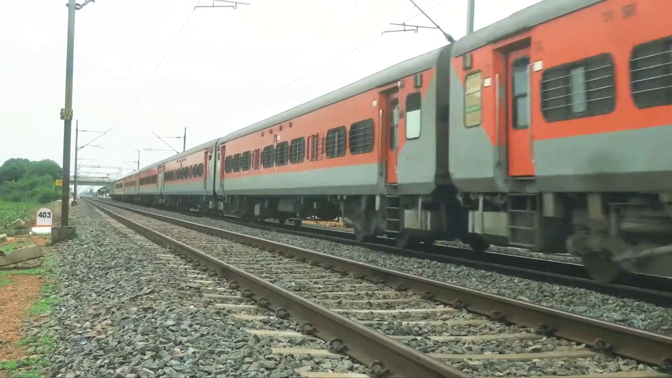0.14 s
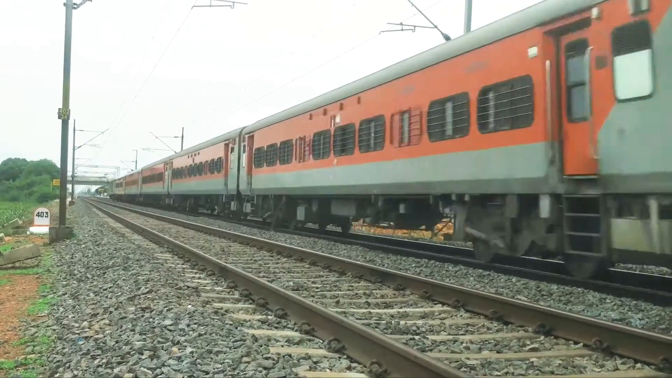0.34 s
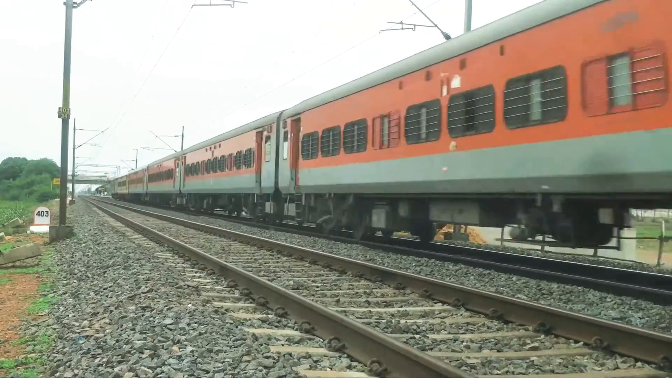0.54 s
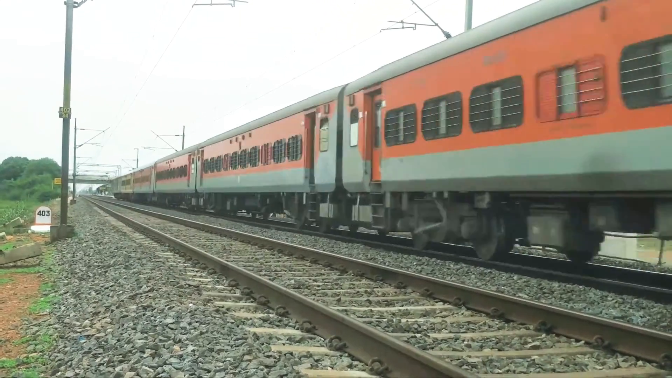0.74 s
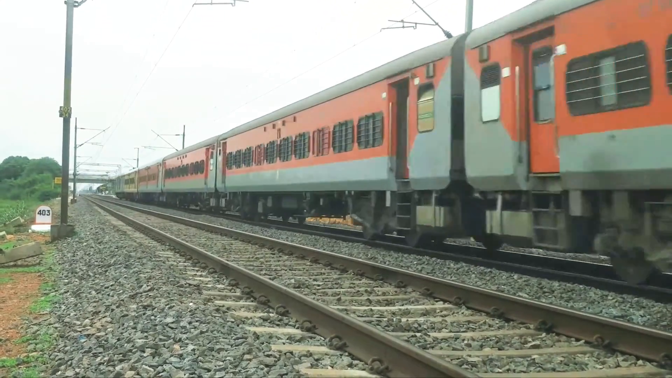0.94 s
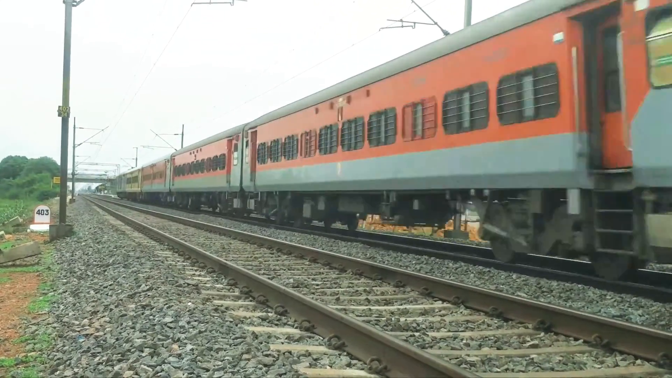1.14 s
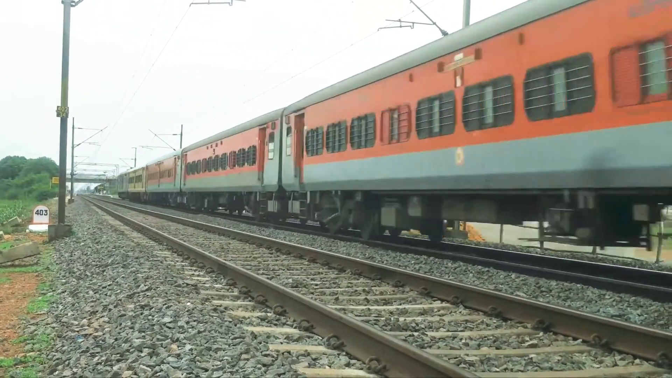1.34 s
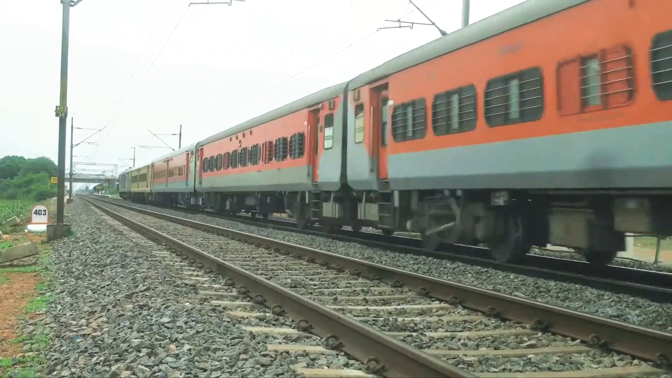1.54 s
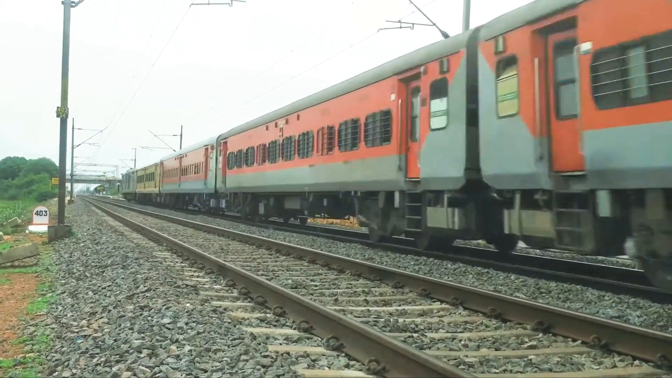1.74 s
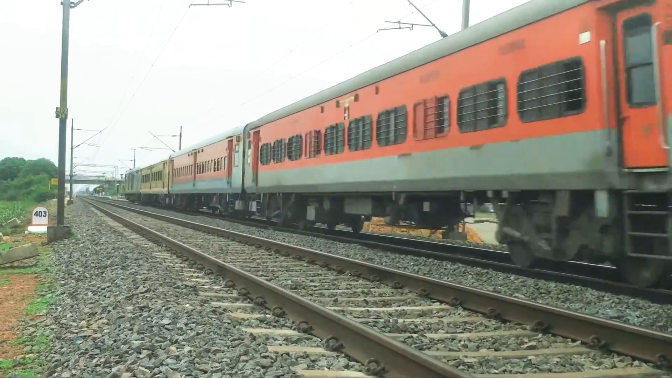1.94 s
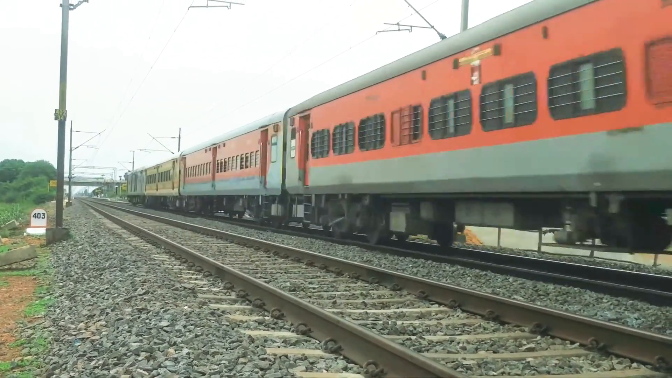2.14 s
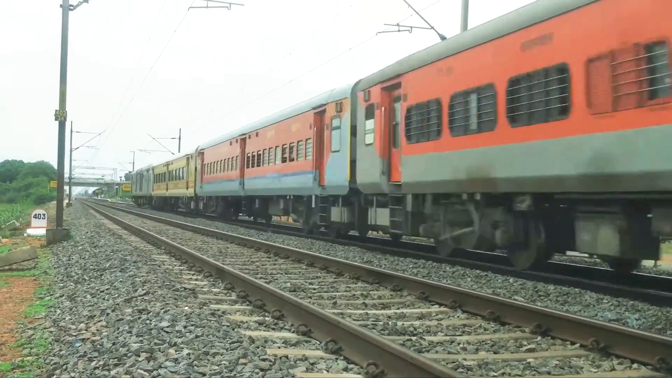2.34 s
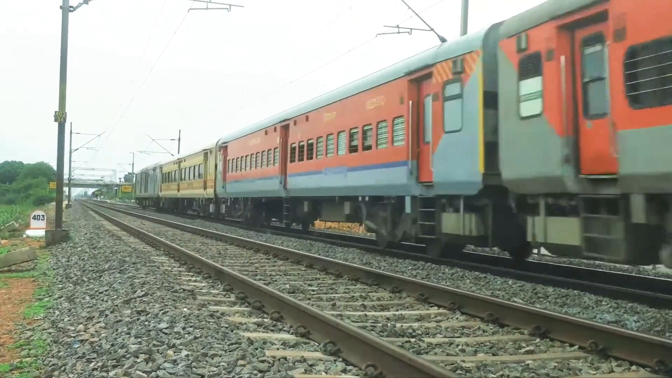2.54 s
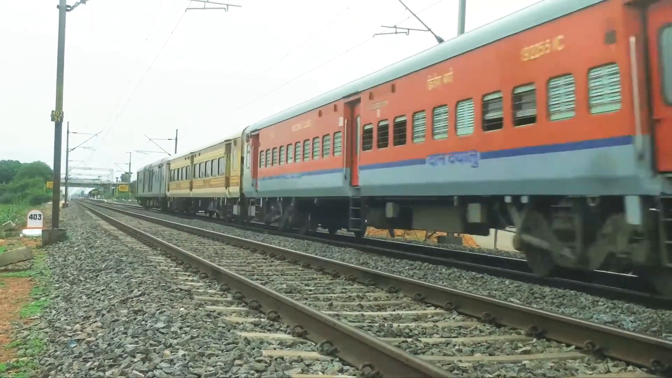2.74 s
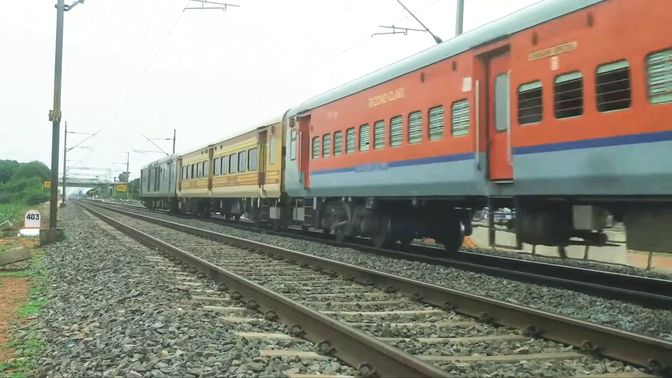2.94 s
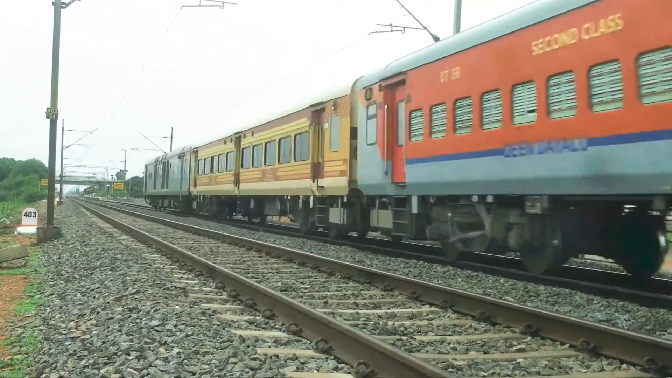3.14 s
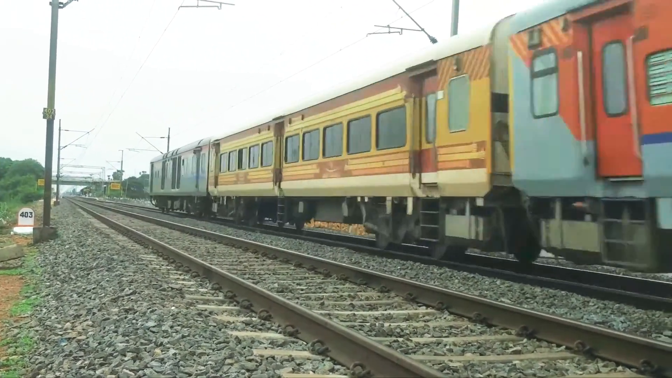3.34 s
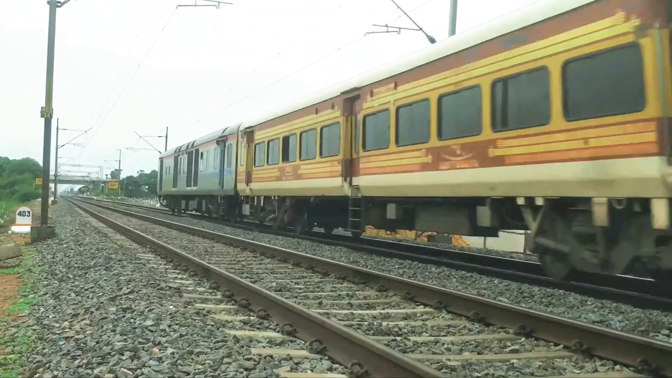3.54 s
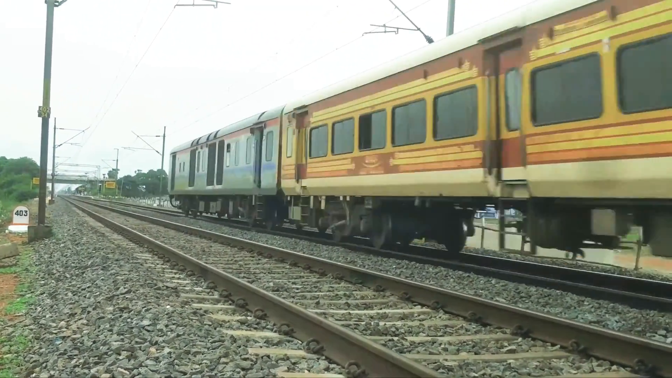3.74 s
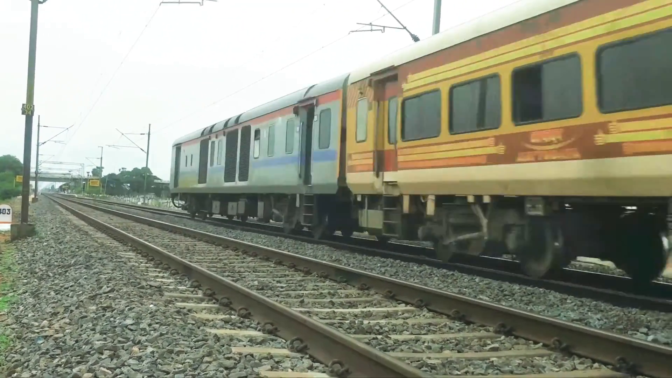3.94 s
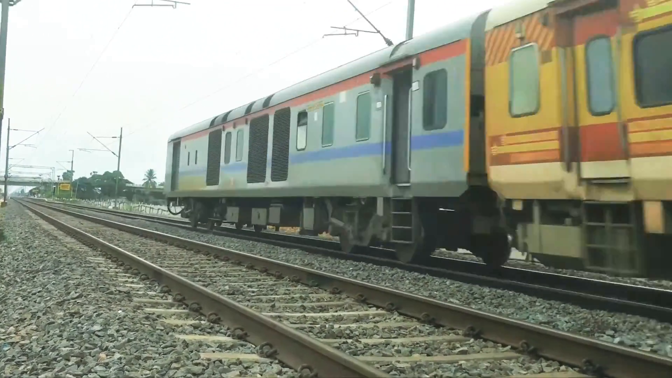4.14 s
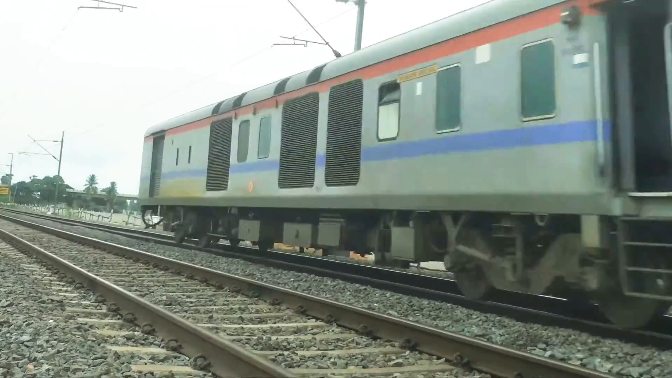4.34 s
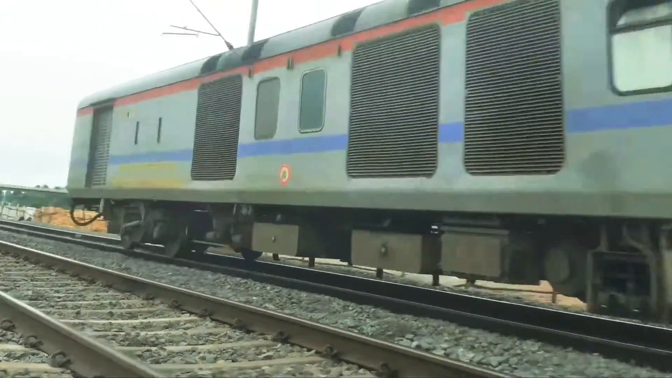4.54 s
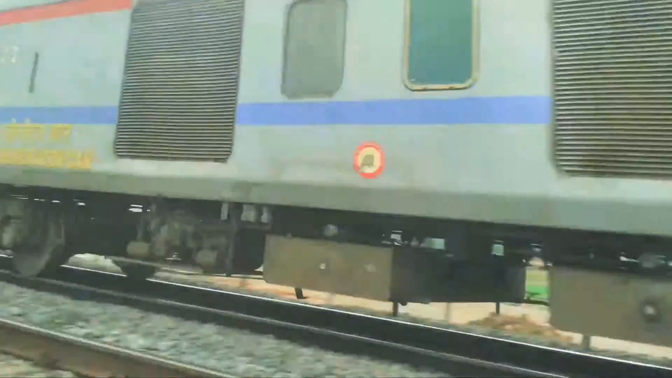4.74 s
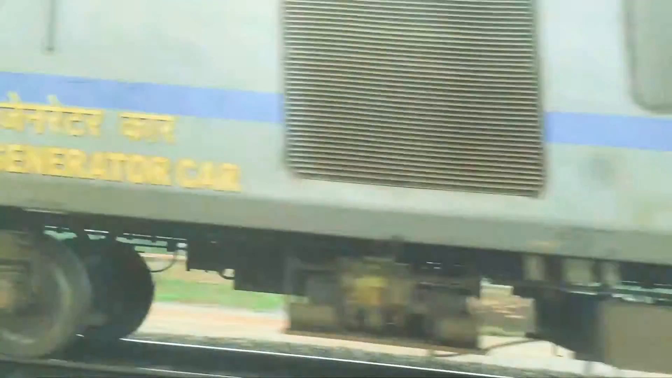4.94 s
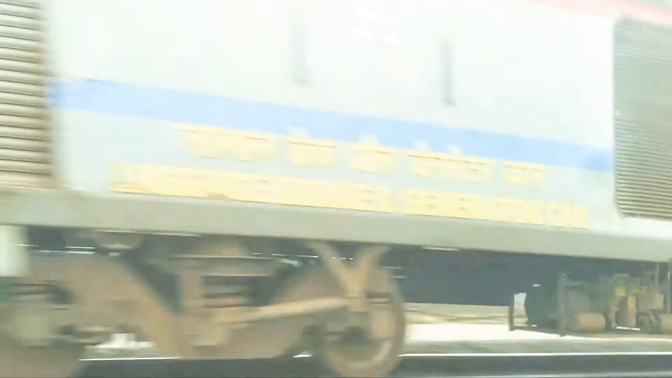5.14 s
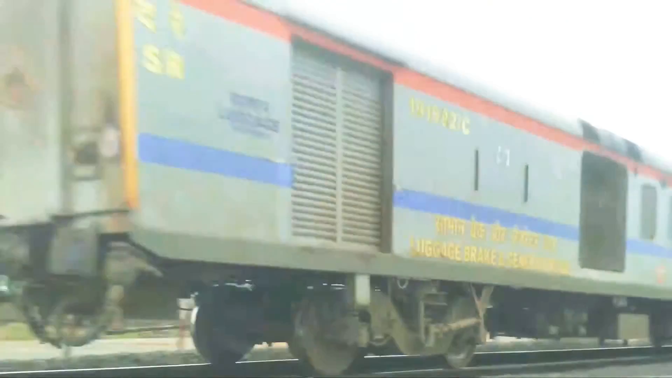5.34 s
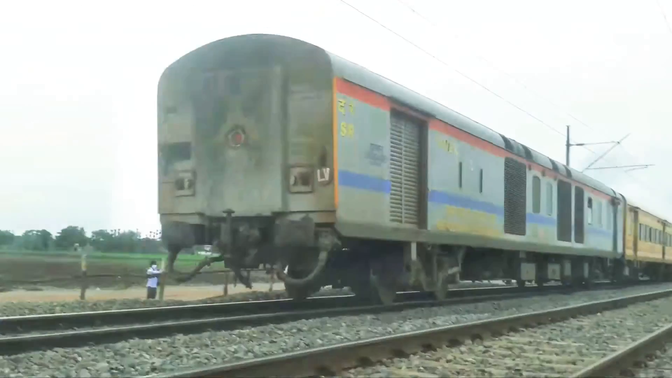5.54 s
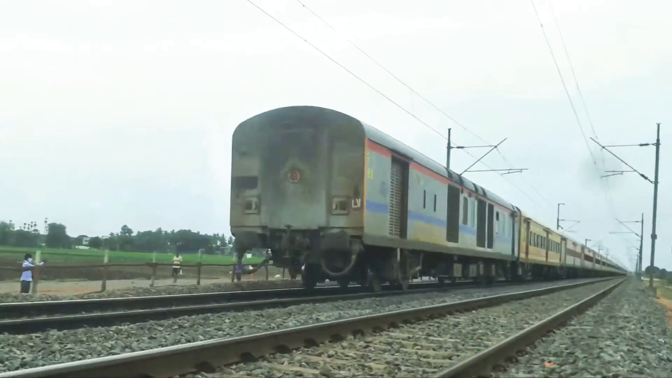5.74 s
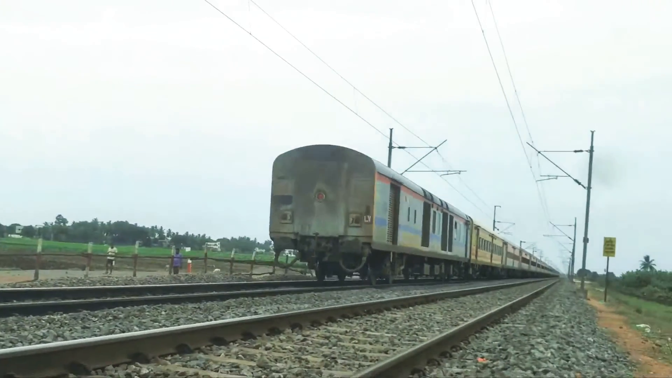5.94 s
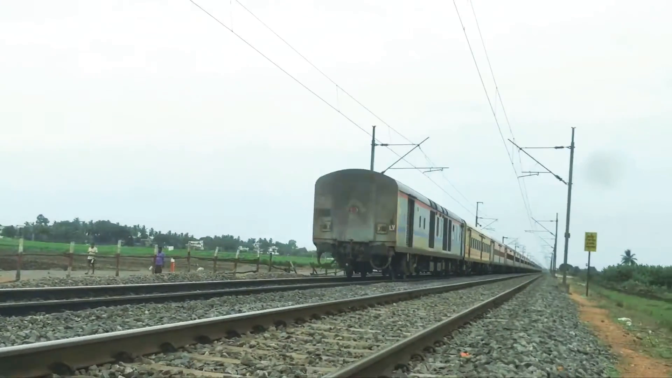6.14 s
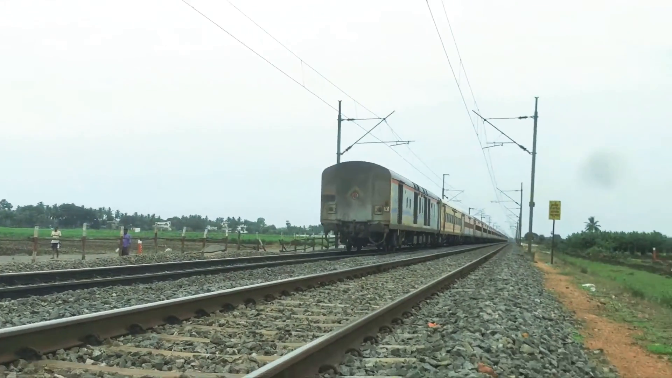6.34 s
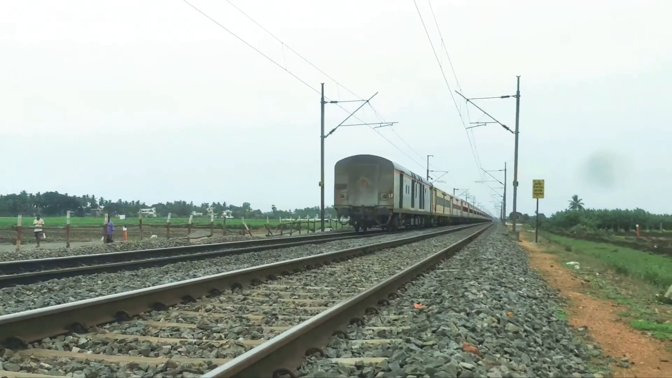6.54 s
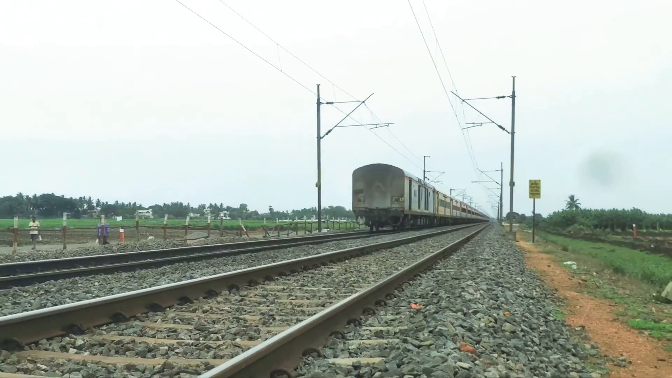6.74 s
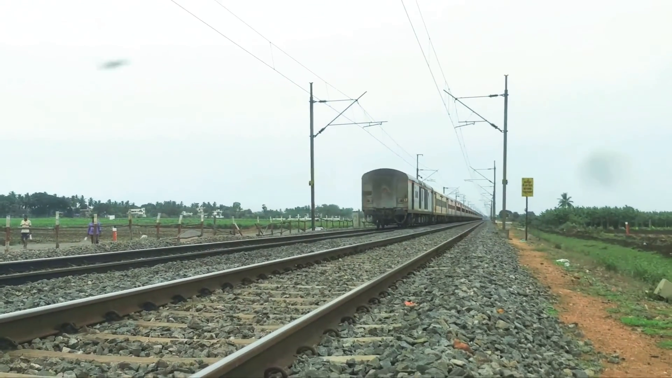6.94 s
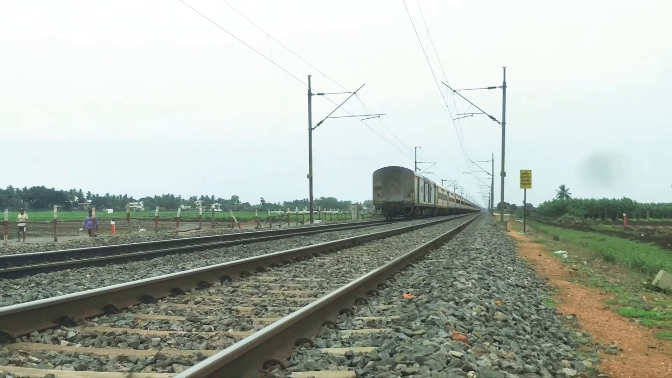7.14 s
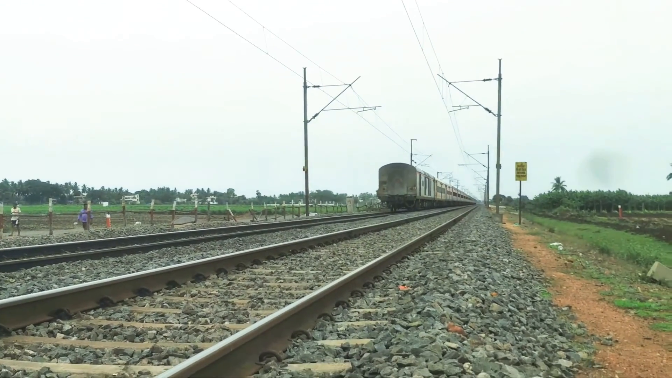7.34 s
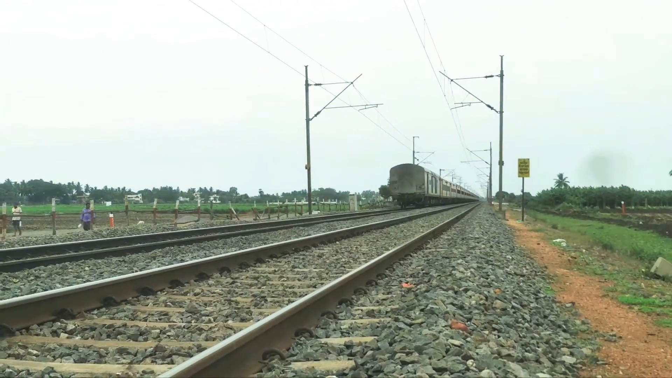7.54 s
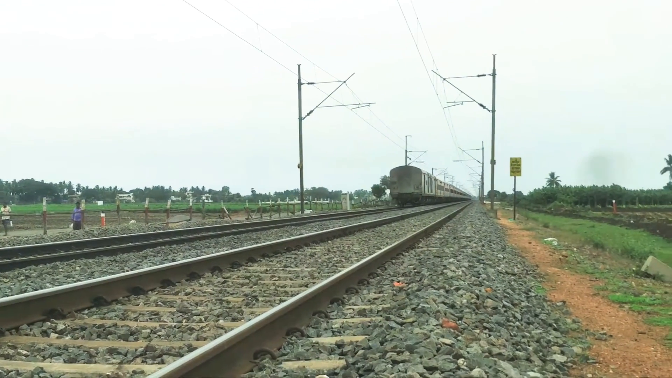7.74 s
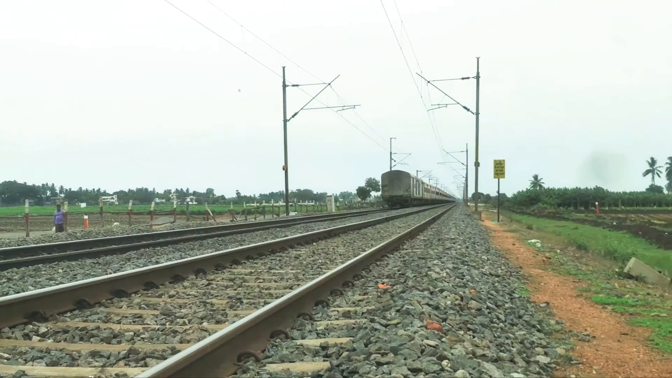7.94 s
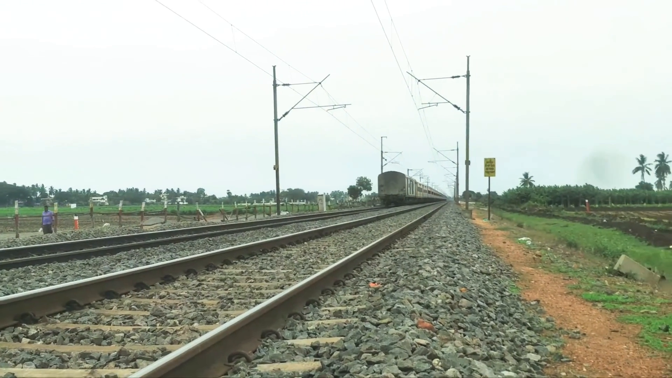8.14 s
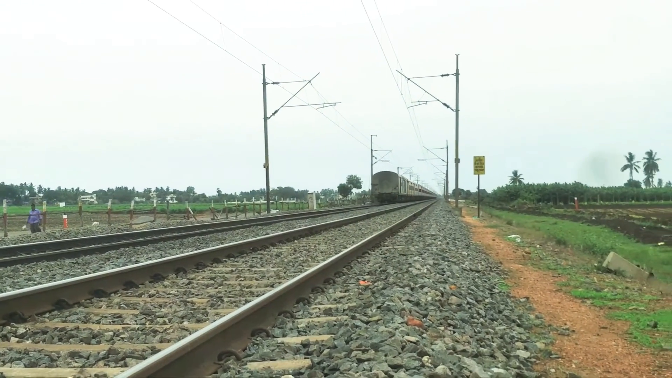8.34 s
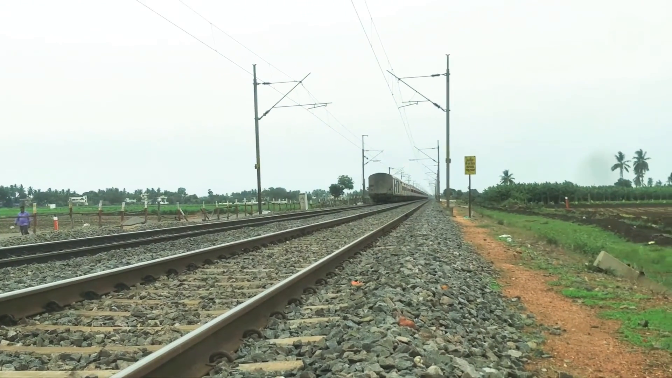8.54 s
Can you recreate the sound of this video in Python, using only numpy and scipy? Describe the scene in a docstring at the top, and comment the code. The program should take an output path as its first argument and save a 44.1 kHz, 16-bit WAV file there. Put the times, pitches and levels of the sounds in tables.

```python
"""A long passenger train rushes past 7 m from a pair of microphones. Worn wheels thump and clang on the rails,
and the ringing of resonant wheel modes glides down in pitch as each pair of bogies goes by. Filtered noise
makes the rumble, roar and hiss; the pair turns to follow the last coach, whose generator hums. Then the last
wheels drum and hum in the distance over steady ringing notes, and a horn, a stack of harmonics, sounds faintly
at the end."""
import sys
import numpy as np
from scipy import signal
from scipy.fft import rfft, irfft, next_fast_len
from scipy.io import wavfile
from scipy.ndimage import uniform_filter1d, minimum_filter1d, map_coordinates

SR = 44100
rng = np.random.default_rng(int(sys.argv[2]) if len(sys.argv) > 2 else 0)


def store_wav(level_fs):
    """Save 16-bit WAV to argv[1]."""
    pcm = np.round(np.clip(np.atleast_2d(level_fs), -1, 1) * 32767)
    wavfile.write(sys.argv[1], SR, pcm.T.astype(np.int16))


N = 379241
SPEED, SOUND_SPEED = 31, 343  # train and sound, m/s
TAIL_S = 5.455  # the last wheels draw level
TURN_S, FIRST_TURN_S = .1008, 5.0826  # one turn of the last wheels and the start of their first, s


def amp(db):
    """Decibels to gain."""
    return 10 ** (np.asarray(db) / 20)


def unit(x):
    """Scale to rms 1."""
    return x / np.sqrt(np.mean(x ** 2) + 1e-20)


def clock():
    """The time of every sample in seconds."""
    return np.arange(N) / SR


def along(points, hz):
    """Read (Hz, value) points at any frequency, on a log axis."""
    f, v = np.transpose(points)
    return np.interp(np.log(hz + 1), np.log(f + 1), v)


def curves(rows):
    """One value per sample for each column after the time."""
    s, *cols = np.transpose(rows)
    return [np.interp(clock(), s, c) for c in cols]


def wobble(rate):
    """A smooth random curve, rate knots a second."""
    finer = 2 ** 4
    knots = rng.standard_normal(int(N * rate / SR) + 4)
    smooth = signal.resample_poly(knots, finer, 1)
    return np.interp(clock() * rate * finer, np.arange(len(smooth)), smooth)


def filtered(x, response):
    """x times a response of frequency."""
    size = next_fast_len(N + SR // 2, real=True)
    hz = np.fft.rfftfreq(size, 1 / SR)
    return irfft(rfft(x, size) * response(hz), size)[..., :N]


def add(track, s, sound):
    """Mix a short sound into a track at time s."""
    start = int(np.clip(round(s * SR), 0, N - 1))
    track[start:start + len(sound)] += sound[:N - start]


# Likeness of the two microphones. Each row: frequency in Hz, left-right likeness from 0 to 1.
LIKENESS = [(60, 0.99), (250, 0.99), (600, 0.76), (1500, 0.38), (2500, 0.099), (4000, 0.088), (10000, 0.18)]


def rush(spectrum):
    """Stereo noise of rms 1, much less alike at the two microphones in the treble than in the bass."""
    def mid_and_side(hz):
        angle = np.arccos(np.clip(along(LIKENESS, hz), -1, 1)) / 2
        return amp(along(spectrum, hz)) * [np.cos(angle), np.sin(angle)]

    mid, side = filtered(rng.standard_normal((2, N)), mid_and_side)
    return unit(np.array([mid + side, mid - side]))


# Where the microphones face. Each row: time in seconds, degrees turned from facing the track
# (negative is towards the oncoming coaches).
FACING = [(0, -62.5), (4.0, -54.5), (4.8, -44.5), (5.0, -22), (5.35, 35.5), (5.6, 58.5), (6.0, 67),
          (8.6, 74)]


def ear_lag(bearing, spacing_ms=0.5):
    """Seconds by which each microphone hears a source late; bearing 0 is straight across the track."""
    heading, = curves(FACING)
    lag = spacing_ms / 1000 * np.sin(bearing - np.radians(heading)) / 2
    return np.array([lag, -lag])


def placed(pair, bearing):
    """Give a stereo sound its direction by its arrival times at the two microphones."""
    t = clock()
    return np.array([np.interp(t - lag, t, ear) for lag, ear in zip(ear_lag(bearing), pair)])


def path(closest_s, t, track_m=7.):
    """Distance in metres and bearing at times t of a bogie that passes at closest_s."""
    x = SPEED * (t - closest_s)
    return np.hypot(x, track_m), np.arctan2(x, track_m)


def receded(fade_s=1.0):
    """0 while the coaches pass, rising to 1 once the last one is by."""
    return np.clip((clock() - TAIL_S) / fade_s, 0, 1)


def near_to_far(near, far):
    """Noise whose colour changes as the train draws away over the ballast."""
    gone = receded()
    return rush(near) * np.sqrt(1 - gone) + rush(far) * np.sqrt(gone)


# Four layers as the coaches pass. Each row: time in seconds, then levels in dB before trim of
# track rumble, rolling roar, rail singing and hiss.
PASSING = [(0.0, -9, -57, -21, -19.5), (0.06, -13.5, -27, -21.5, -22.5), (0.35, -12.5, -19.5, -17.5, -28.5),
           (0.49, -12.5, -20, -14.5, -24.5), (0.59, -14.5, -19, -20.5, -24.5),
           (0.82, -15.5, -21.5, -19, -29), (1.13, -18.5, -23.5, -23.5, -33.5), (1.2, -15, -22, -21, -30),
           (1.499, -10.5, -16, -20, -26.5), (2.38, -13.5, -20, -20, -27), (2.6, -19, -27, -23.5, -33),
           (2.68, -20, -27, -22.5, -35), (3.47, -16, -21.5, -21.5, -28.5), (3.7, -15, -23, -20, -28.5),
           (4.27, -17.5, -22.5, -20.5, -31.5), (4.48, -9.5, -13, -17.5, -24), (4.6, -10, -18, -19.5, -26),
           (5.17, -12.5, -16, -18.5, -19), (5.37, -13.5, -22, -23, -23.5), (5.4, -15, -22, -24, -26.5)]
# The same four layers, one row each: trim in dB, power of distance by which the tail fades,
# distant train in dB as the last wheels draw level, its fading in dB per second.
RECEDING = [(-0.5, 1.68, -32, 1), (0.22, 1.58, -32, 3), (1.5, 2.7, -33, 3), (-0.5, 2.7, -34.5, 3.5)]


def layer_levels():
    """Level of each layer in dB: the near coaches, fading with distance behind the last, over the distant train."""
    behind_s = np.maximum(clock() - TAIL_S, 0)
    distance, _ = path(TAIL_S, clock())
    nearness = np.where(behind_s > 0, distance.min() / distance, 1)
    levels = []
    for near_db, (trim_db, falloff, far_db, fade_db) in zip(curves(PASSING), RECEDING):
        near = amp(near_db + trim_db) * nearness ** falloff
        far = amp(far_db - fade_db * behind_s)
        levels.append(20 * np.log10(np.hypot(near, far)))
    return levels


# Bogies at each coach end. Each row: time when closest in seconds, relative level in dB,
# pitch ratio of their wheels.
BOGIE_PASSES = [(-0.2, 8.5, 1.03), (0.53, -2, 0.97), (1.3, -2, 1.04), (2.02, 5, 0.95), (2.8, 2, 1.01),
                (3.57, 2.5, 0.92), (4.42, 0, 0.98), (5.2, 3, 1.01)]


def nearest(step_s=0.01):
    """Bearing of the train's sound: it swings along with each nearest pair of bogies, then follows the last."""
    s = np.arange(0, N / SR + step_s, step_s)
    distance, bearing = np.transpose([path(closest_s, s) for closest_s, _, _ in BOGIE_PASSES], (1, 0, 2))
    return np.interp(clock(), s, np.average(bearing, axis=0, weights=distance ** -2))


# Wheel modes at rest, before each bogie's pitch ratio. Each row: frequency in Hz, relative level in dB.
WHEEL_MODES = [(1640, -1.5), (1790, -11), (2096, -0.5), (2266, -3), (2333, 0), (2577, -13.5), (2628, -10.5),
               (3086, -8), (3305, -7), (3838, -13), (4200, -18.5)]


def wheels(falloff=0.5, damping=0.009):
    """Rail roughness keeps each wheel's modes ringing; the changing travel time bends their pitch."""
    t, out, power = clock(), np.zeros((2, N)), np.zeros(N)
    size = next_fast_len(N + 2 * SR, real=True)
    hz = np.fft.rfftfreq(size, 1 / SR)
    emitted = np.arange(size) / SR - 3 / 2  # ringing starts early enough for the travel time
    grid = np.arange(0, SR / 2, 2)
    for closest_s, db, pitch in BOGIE_PASSES:
        modes = sum(amp(level) / (1 + (2 * (grid / (f * pitch) - 1) / damping) ** 2)
                    for f, level in WHEEL_MODES)
        random_phase = np.exp(2j * np.pi * rng.random(len(hz)))
        ring = unit(irfft(np.interp(hz, grid, modes) * random_phase, size))
        distance, bearing = path(closest_s, t)
        gain = amp(db) / distance ** falloff
        out += gain * np.interp(t - distance / SOUND_SPEED - ear_lag(bearing), emitted, ring)
        power += gain ** 2
    return out / np.sqrt(power)


# Wheels with a flat spot, which clangs once a turn. Each row: first strike in seconds, strikes,
# turn in seconds, relative level in dB, change per strike in dB, lull before the strike from 0 to 1.
FLAT_SPOTS = [(0.0, 4, 0.0935, -1.5, -1.2, 1), (0.030, 3, 0.099, -8, -0.5, 0.2),
              (0.455, 4, .0935, -3, -0.4, 0.8), (1.385, 1, 0.09, -5.5, 0, 1), (1.475, 5, 0.09, -7, 0, 1),
              (1.812, 3, 0.09, -14, 0, 1), (1.832, 6, 0.086, -4, -0.93, 1), (2.190, 3, 0.089, -12, -2, 1),
              (2.736, 5, 0.097, -11, -2.5, 0), (3.606, 5, 0.094, -4.5, -2.2, 1),
              (4.320, 4, .0865, -8, 0.5, 0), (4.371, 4, 0.094, -15, 0.4, 1), (4.458, 3, 0.087, -14, 0, 1),
              (4.845, 5, .0895, -8.5, -1.2, .6), (5.022, 1, .0895, -1, 0, 1), (7.615, 1, .1008, -18, 0, 1)]


def strikes():
    """Every strike of every flat spot: (s, dB, lull)."""
    return [(first_s + k * turn_s, db + k * change_db, lull)
            for first_s, count, turn_s, db, change_db, lull in FLAT_SPOTS
            for k in range(round(count))]


def clangs(t60=0.14, rise_s=.0006):
    """Strength of the steel's ringing after the flat spots strike; overlapping rings add in power."""
    power, t = np.zeros(N), np.arange(SR // 3) / SR
    for s, db, _ in strikes():
        ringing = amp(db - 60 * t / t60) * (1 - np.exp(-t / rise_s))
        add(power, s - rise_s, ringing ** 2)
    return np.sqrt(power)


def lulls(half_s=0.013, lead_s=0.025):
    """1 while a wheel is unloaded: just before a flat spot strikes, and on every turn of the last wheels."""
    centre_s = 1 / 20
    out = np.zeros(N)
    dip = np.exp(-((np.arange(SR // 10) / SR - centre_s) / half_s) ** 2)
    before = [(s - lead_s, depth) for s, _, depth in strikes()]
    turns = [(s, 1) for s in np.arange(FIRST_TURN_S, N / SR, TURN_S)]
    for s, depth in before + turns:
        if s > centre_s:
            add(out, s - centre_s, depth * dip)
    return np.clip(out, 0, 1)


def clumped(pair, depth_db, width=.017, life_s=.075, fall_per_s=.55):
    """Many short-lived resonances slide down in pitch as the wheels go by, then settle and even out with distance."""
    hz, s, z = signal.stft(pair, SR, nperseg=1024)
    gone = np.interp(s, clock(), receded())
    fallen = fall_per_s * np.cumsum(1 - gone) * s[1]  # in log frequency, as is width
    pitch, age = np.broadcast_arrays((np.log1p(hz)[:, None] + fallen) / width, s / life_s)
    knots = rng.standard_normal((int(pitch.max()) + 2, int(age.max()) + 2))
    bumps = unit(map_coordinates(knots, [pitch, age], order=1))
    patches = amp(depth_db * (1 - gone / 2) * bumps)
    patches /= np.sqrt(np.mean(patches ** 2, axis=0))
    return unit(signal.istft(z * patches, nperseg=1024)[1][:, :N])


# Spectrum of the singing rails. Each row: frequency in Hz, relative level in dB per Hz.
RAIL_SPECTRUM = [(900, -18), (1300, -11), (1520, 0.5), (1850, -1.5), (2150, 1), (2450, -1.5), (2700, -12),
                 (3500, -44), (4800, -51), (7000, -68), (11000, -92)]


def steel(level, rail_db=-3.5, rail_blow_db=-11.5, wheel_blow_db=-16.5, flutter_db=0.86, far_db=0.5):
    """The rails sing beside the nearest wheels, the wheels from where they are; every clang excites both."""
    wheel_db = rail_db - 2 - 1.5 * receded(fade_s=1.6)
    blows = clangs()
    rolling = amp(level + flutter_db * wobble(35) + far_db * receded())
    rails = placed(clumped(rush(RAIL_SPECTRUM), depth_db=4.5), nearest())
    rail_gain = np.hypot(rolling * amp(rail_db), blows * amp(rail_blow_db))
    wheel_gain = np.hypot(rolling * amp(wheel_db), blows * amp(wheel_blow_db))
    return rails * rail_gain + wheels() * wheel_gain


def pings(level, low_hz=1479.0, high_hz=2541.0):
    """Small dents and flat-spot strikes set a few notes of the steel ringing; the dents' grain fades behind the train."""
    per_s, t60, ear_spread = 55, .08, .8  # dents a second, decay in s, phase spread in radians
    level_db, strike_db, scatter_db = -9, -11, 3.5
    t = np.arange(SR // 12) / SR
    decay = amp(-60 * t / t60) * (1 - np.exp(-t / .001))

    def rung(hits):
        out = np.zeros((2, N))
        for s, db in hits:
            notes_hz = rng.uniform(low_hz, high_hz, size=(3, 1))
            phase = 2 * np.pi * notes_hz * t + ear_spread * rng.standard_normal((2, 3, 1))
            for ear, ring in zip(out, amp(db) * decay * np.sin(phase).sum(axis=1)):
                add(ear, s, ring)
        return out

    dent_s = rng.uniform(0, N / SR, size=round(per_s * N / SR))
    dents = [(s, scatter_db * rng.normal()) for s in dent_s]
    grain = unit(rung(dents)) * amp(level + level_db) * (1 - receded())
    struck = rung([(s, db + strike_db) for s, db, _ in strikes()])
    return placed(grain + struck, nearest())


def faint_squeals(steel_level, low_hz=1555.0, high_hz=4252.0, length_s=0.042, fall=0.56, count=420):
    """Many fainter squeals at random times and pitches, following the singing of the rails."""
    under_db, octave_db = -7.5, -8  # at the lowest pitch, and per octave above it
    squeal_rows = []
    for u, v in rng.random((count, 2)):
        s, hz = u * TAIL_S, low_hz * (high_hz / low_hz) ** v
        db = steel_level[int(s * SR)] + under_db + octave_db * np.log2(hz / low_hz)
        squeal_rows.append((s, hz, db, length_s, fall))
    return squeal_rows


# The loudest wheels singing out as they near. Each row: middle in seconds, pitch in Hz,
# relative level in dB, half length in seconds, share of the pitch lost per second.
LOUD_SQUEALS = [(.02, 2170, -18.5, 0.095, 0.33), (.13, 3820, -27, 0.027, 0.39),
                (.39, 1830, -15, 0.053, 0.78), (.61, 4260, -27, 0.043, 0.23), (.92, 3680, -20, 0.052, 0.34),
                (1.3, 2140, -21.5, 0.067, 0.26), (1.96, 2284, -17.5, 0.088, 0.85),
                (2.06, 2150, -22, 0.19, 0.48), (1.98, 1805, -19.5, 0.07, 0.29),
                (2.43, 2130, -20, 0.027, 0.41), (2.74, 2374, -21, 0.048, 0.5),
                (2.77, 2145, -22, 0.024, 0.39), (2.94, 2150, -21.5, 0.022, 0.28),
                (3.25, 3580, -24, 0.025, 0.26), (3.72, 2070, -15, 0.02, .3),
                (3.93, 2156, -25.5, 0.13, 0.24), (5.2, 3710, -28, 0.071, .7), (5.22, 3140, -22, 0.063, 0.8),
                (.36, 2400, -20, .06, .6)]


def squeals(steel_level, level_db=-1.8, rough=0.99):
    """A wheel mode swells for a moment and slides down as the wheel draws level."""
    out, t = np.zeros(N), clock()
    for s, hz, db, length_s, fall in list(LOUD_SQUEALS) + faint_squeals(steel_level):
        near = slice(max(int((s - 3 * length_s) * SR), 0), int((s + 3 * length_s) * SR))
        u = t[near] - s
        phase = 2 * np.pi * (hz * (u - fall * u ** 2 / 2) + rng.random())
        out[near] += amp(db + level_db) * np.exp(-(u / length_s) ** 2) * np.sin(phase)
    roughness = 1 + rough * np.array([wobble(75), wobble(80)])
    return placed(out * roughness, nearest())


def thud(hz, cycles):
    """A blow on the sleepers: a swing that swells and dies within a few cycles."""
    phase = hz * np.arange(SR // 10) / SR
    u = phase / cycles
    return u * np.exp(1 - u) * np.sin(2 * np.pi * phase)


# The heaviest single wheel blows on the track. Each row: start in seconds, relative level in dB, pitch in Hz.
BLOWS = [(-0.002, -3.5, 195), (0.028, -7.5, 206), (0.134, -6.5, 234), (0.218, -4, 214), (0.282, -7, 207),
         (0.383, -4.5, 208), (0.457, -2.5, 204), (0.486, -7.5, 196), (0.503, -11, 222), (0.544, -4.5, 190),
         (0.594, -5.0, 209), (0.68, -8, 204), (0.771, -6.5, 216), (0.833, -6.5, 199), (0.879, -6, 194),
         (0.963, -4, 201), (1.063, -6.0, 206), (1.48, -2, 225), (1.515, -2, 207), (1.589, -3, 206),
         (1.658, -3.5, 202), (1.743, -6.0, 252), (1.81, -4.0, 227), (1.855, 0, 260), (1.9, -4.5, 195),
         (1.919, -2, 193), (1.991, -6, 198), (2.122, -6.5, 200), (2.201, -8, 214), (2.22, -3, 242),
         (2.275, -3, 180), (3.531, -6, 217), (3.727, -9, 186), (4.321, -4, 283), (4.37, -3.5, 241),
         (4.391, -4, 237), (4.457, 0, 229), (4.491, -8, 216), (4.545, -7, 205), (4.579, -2.5, 220),
         (4.636, 0, 212), (4.669, -3.5, 212), (4.825, -6.5, 217), (4.861, -6, 212), (4.923, -6.5, 227),
         (5.238, -6.5, 213), (5.326, -7, 228), (5.355, -4, 220), (5.432, -6.5, 221)]


def thumps(cycles=0.9, knock_hz=552.0, knock_db=-12.0, knock_cycles=1.63):
    """Heavy wheel blows shake the track and knock on the sleepers, no two quite alike."""
    out = np.zeros(N)
    for s, db, hz in BLOWS:
        knock = thud(knock_hz * np.exp(0.22 * rng.normal()), knock_cycles)
        add(out, s, amp(db) * (thud(hz, cycles) + amp(knock_db) * knock))
    return out


# Worn spots round the last wheels. Each row: place as a share of a turn, relative level in dB, pitch in Hz.
WORN_SPOTS = [(0.159, -1, 106), (0.438, 10, 93), (.68, -7, 62)]
# Level of their drumming. Each row: time in seconds, relative level in dB.
DRUMMING_LEVEL = [(5.3, -28), (5.7, -30), (6.0, -32.5), (6.7, -33.5), (7.1, -41), (7.5, -37), (8.1, -45),
                  (8.6, -35.5)]


def drumming(level_db=-0.5, cycles=.5, scatter_db=1.5):
    """The same worn spots of the last wheels come round on every turn, soft and low."""
    out = np.zeros(N)
    for start in np.arange(FIRST_TURN_S, N / SR, TURN_S):
        for share, db, hz in WORN_SPOTS:
            add(out, start + share * TURN_S, amp(db + scatter_db * rng.normal()) * thud(hz, cycles))
    return out * amp(curves(DRUMMING_LEVEL)[0] + level_db)


def tread(spectrum):
    """The uneven tread of a wheel plays the same rough pattern on every turn; rms 1."""
    turn = irfft(np.exp(2j * np.pi * rng.random(round(TURN_S * SR / 2) + 1)))
    return unit(filtered(np.resize(turn, N), lambda hz: amp(along(spectrum, hz))))


# Rumble of the track and coaches close by, rumble of the distant train, and drone of the last wheels'
# uneven treads. Each row: frequency in Hz, relative level in dB per Hz.
NEAR_RUMBLE = [(20, -35), (38, -17.5), (58, -7), (100, -2), (150, -1.5), (220, -0.5), (290, -6),
               (380, -18.5), (700, -69)]
DISTANT_RUMBLE = [(20, -21), (38, -18), (56, 0), (95, -1.5), (118, -15), (155, -8), (220, -4.5), (280, -13),
                  (350, -16), (700, -59), (3000, -100)]
TREAD_DRONE = [(105, -30), (145, 7), (235, 3), (290, 6), (340, -14), (480, -45), (2000, -100)]


def rumble(level, level_db=-0.5, lumps_db=1., far_db=-2.0, tread_db=-6.5, lull_db=-1.5):
    """Track and coach bodies rumble and throb with the wheels; behind the train the last wheels' treads drone on."""
    gone = receded()
    lumps = unit(amp(lumps_db * wobble(45)))
    gain = amp(level + level_db + lull_db * lulls() * (2 - gone / 2)) * lumps
    far = amp(tread_db) * tread(TREAD_DRONE) + amp(far_db) * rush(DISTANT_RUMBLE)
    body = rush(NEAR_RUMBLE) * np.sqrt(1 - gone) + far * np.sqrt(gone)
    return placed(body * gain + thumps() + drumming(), nearest())


# Roar close by and far off. Each row: frequency in Hz, relative level in dB per Hz.
NEAR_ROAR = [(150, -66), (350, -4), (480, -7.5), (640, -6.5), (950, -6.5), (1280, -14.5), (1800, -11.5),
             (4000, -75)]
DISTANT_ROAR = [(150, -4.5), (280, -7.5), (400, -4.5), (560, -4.5), (850, -1), (1050, -0.5), (1300, -8),
                (1800, -6), (4000, -49.5), (9000, -95)]


def roar(level, rattle_db=2.0, blow_db=-13.0):
    """The running gear roars and rattles, harder with every clang and more evenly with distance."""
    rattle = unit(amp(rattle_db * (1 - .7 * receded()) * wobble(70)))
    gain = np.hypot(rattle * amp(level), clangs() * amp(blow_db))
    return placed(near_to_far(NEAR_ROAR, DISTANT_ROAR) * gain, nearest())


# Hiss close by and far off, and the sizzle of scraping wheels.
# Each row: frequency in Hz, relative level in dB per Hz.
NEAR_HISS = [(2000, -17.5), (2800, 1.5), (3700, -1.5), (4300, -6), (5000, -10.5), (6300, -17.5),
             (8000, -29), (10000, -34), (13000, -38), (15000, -76)]
DISTANT_HISS = [(2000, -10), (2900, -1.5), (3500, -7.5), (4300, -12), (5000, -19.5), (7000, -28),
                (9000, -39), (15000, -38)]
SIZZLE_SPECTRUM = [(2500, -30), (3800, -2.5), (5500, -0.5), (7000, -5), (9000, -21), (13000, -20.5),
                   (15000, -43)]
# The nearest wheels scrape by. Each row: middle in seconds, level in dB, half length in seconds.
SCRAPES = [(1.982, -33.5, 0.082), (4.583, -39, 0.39), (5.072, -30.5, 0.092)]


def hiss(level, level_db=0.5, flutter_db=1.2, blow_db=-17.5):
    """Bright hiss of the wheel contacts, carried along the rails, with sizzles from the nearest wheels."""
    gain = np.hypot(amp(level + level_db + flutter_db * wobble(40)), clangs() * amp(blow_db))
    scrape = sum(amp(db) * np.exp(-((clock() - s) / length_s) ** 2) for s, db, length_s in SCRAPES)
    contacts = clumped(near_to_far(NEAR_HISS, DISTANT_HISS), depth_db=3.8)
    return placed(contacts * gain + rush(SIZZLE_SPECTRUM) * scrape, nearest())


# Hollow booms from under single coaches. Each row: middle in seconds, pitch in Hz, level in dB,
# half length in seconds.
COACH_BOOMS = [(2.096, 92, -18, 0.14), (2.24, 120, -18.5, 0.15), (4.13, 79, -20, 0.32)]


def booms(waver=0.0478):
    """Now and then a coach booms on one low, wavering note as it comes by."""
    t, out = clock(), np.zeros(N)
    drift = np.cumsum(1 + waver * wobble(25)) / SR
    for s, hz, db, length_s in COACH_BOOMS:
        out += amp(db) * np.exp(-((t - s) / length_s) ** 2) * np.sin(2 * np.pi * hz * drift)
    return placed(np.sqrt(2) * np.array([out, out]), 0)


def generator(hum_hz=416.0, loudest_s=5.58, length_s=0.7, level_db=-40, rough=0.78):
    """The generator in the last coach hums briefly as it draws away."""
    t = clock()
    swell = amp(level_db) * np.exp(-((t - loudest_s) / length_s) ** 2) * (1 + rough * wobble(30))
    return np.sqrt(2) * swell * np.sin(2 * np.pi * hum_hz * t + wobble(22))


# Hum of the last wheels, which are out of round. Each row: frequency in Hz before rounding to a multiple
# of the turning rate, level in dB before fading, fading in dB per second.
HUM_TONES = [(49.6, -41, 0.5), (59.2, -36.5, 1), (89.3, -36, 5.5), (99.2, -41, 5.5), (158.7, -50, 1),
             (238, -52, 1.5)]


def wheel_hum(waver_db=3.5):
    """The low hum of the last wheels comes clear behind the train, wavers in level and slowly fades."""
    t = clock()
    fading_s = np.maximum(t - TAIL_S - 1, 0)
    tones = np.zeros(N)
    for hz, db, fade in HUM_TONES:
        gain = amp(db - fade * fading_s + waver_db * wobble(2.46))
        turns = round(hz * TURN_S) * t / TURN_S
        tones += gain * np.sin(2 * np.pi * (turns + rng.random()))
    return np.sqrt(2) * tones * receded(fade_s=0.39)


# Steady notes that ring on behind the train. Each row: frequency in Hz, level in dB before swell and fading.
TAIL_NOTES = [(1590, -57), (1922, -48), (2078, -47.5), (2160, -60), (2396, -55), (3031, -64), (3450, -55)]


def tail_ring(swell_db, width=0.021, fade_db_per_s=2.5):
    """Behind the train steady notes ring on at fixed pitches, slowly fading."""
    def notes(hz):
        return sum(amp(db) / np.sqrt(f) / (1 + (2 * (hz / f - 1) / width) ** 2) for f, db in TAIL_NOTES)

    shared, left, right = filtered(rng.standard_normal((3, N)), notes)
    total = np.linalg.norm([amp(db) for _, db in TAIL_NOTES])
    gain = amp(swell_db - fade_db_per_s * (clock() - TAIL_S - 1.5)) * receded(fade_s=0.25)
    return total * gain * unit(shared + np.array([left, right]))


# Harmonics of the far horn. Each entry: level in dB before trim, from the fundamental up.
HORN_HARMONICS = [-49, -50, -46, -49.5, -66, -58]


def horn(pitch_hz=272.3, start_s=8.17, rise_s=0.12, waver=0.0028, level_db=-0.5):
    """A far horn, a steady stack of harmonics made unsteady by the air."""
    phase = 2 * np.pi * np.cumsum(pitch_hz * (1 + waver * wobble(30))) / SR
    tone = sum(amp(db + level_db + 1.4 * wobble(5.1)) * np.sin(k * phase)
               for k, db in enumerate(HORN_HARMONICS, 1))
    return np.sqrt(2) * tone * np.clip((clock() - start_s) / rise_s, 0, 1)


# The distant clatter swells and sinks. Each row: time in seconds, change of level in dB.
DISTANT_SWELL = [(5.6, -0.5), (6.4, -0.4), (7.15, 2), (7.35, 1), (7.57, 5), (7.75, 1), (8.6, 2)]


def scene(roar_lull_db=-4.0, steel_lull_db=-2.0, left_db=1.):
    """All the sounds of the train together; as it recedes the lulls blur and it lies a little to the left."""
    rumble_db, roar_db, steel_db, hiss_db = layer_levels()
    swell_db, = curves(DISTANT_SWELL)
    lull = lulls() * (1 - .9 * receded())
    high = steel(steel_db + steel_lull_db * lull + swell_db)
    high += pings(steel_db + 2 * steel_lull_db * lull) + squeals(steel_db)
    high += hiss(hiss_db + swell_db) + tail_ring(swell_db)
    low = rumble(rumble_db) + roar(roar_db + roar_lull_db * lull + swell_db / 2)
    low += booms() + wheel_hum()
    balance = amp(left_db * receded() * np.array([[.5], [-.5]]))
    return (low + high + generator() + horn()) * balance


def limited(x):
    """A fast limiter turns both ears down around the biggest peaks."""
    needed = np.minimum(1, 1.1 / (np.abs(x).max(axis=0) + 1e-9))
    return x * uniform_filter1d(minimum_filter1d(needed, size=180), size=180)


# How the two microphones differ. Each row: frequency in Hz, left minus right in dB.
MICROPHONE_TILT = [(100, -0.5), (600, -0.5), (1000, 1.5), (1600, 2.5), (2400, 2.5), (3800, -4.5),
                   (10000, -2)]


def record(dry, notch_hz=4850.0, notch_width_hz=280.0, notch_db=-4.5, top_hz=14200):
    """Two slightly unlike microphones with a narrow notch, then a limiter; what passes it clips, below a top cut."""
    def response(hz):
        notch = notch_db * np.exp(-((hz - notch_hz) / notch_width_hz) ** 2)
        return amp(notch + np.array([[.5], [-.5]]) * along(MICROPHONE_TILT, hz))

    heard = filtered(dry, response)
    return filtered(np.clip(limited(heard), -1, 1), lambda hz: hz < top_hz)


dry = scene()
out = record(dry)
store_wav(out)
```